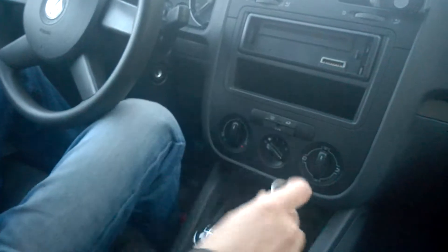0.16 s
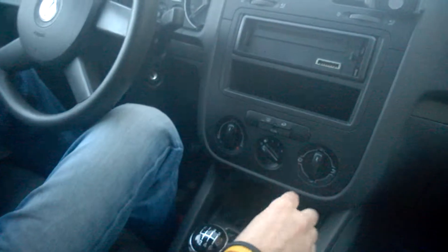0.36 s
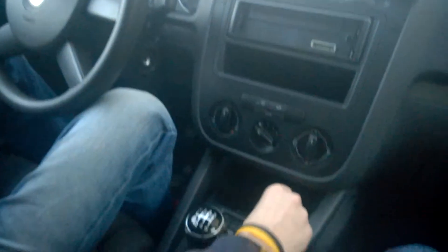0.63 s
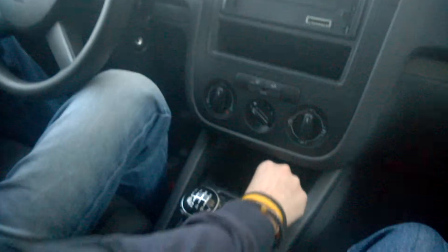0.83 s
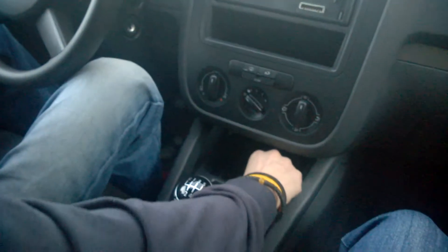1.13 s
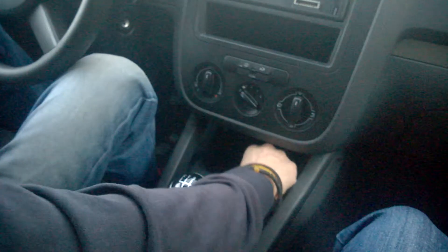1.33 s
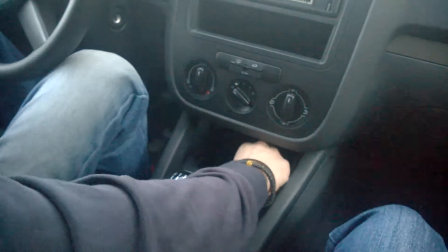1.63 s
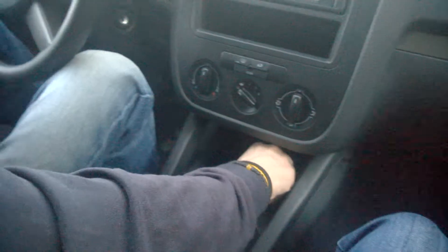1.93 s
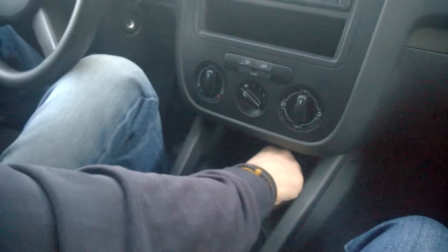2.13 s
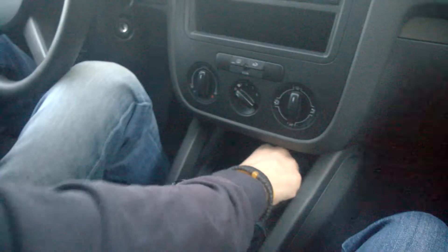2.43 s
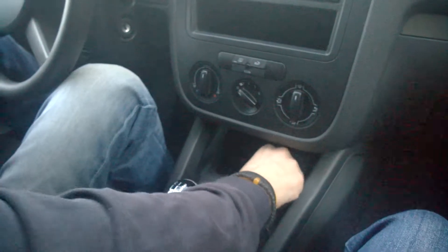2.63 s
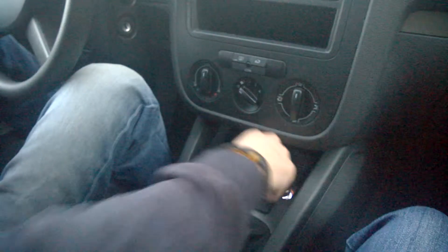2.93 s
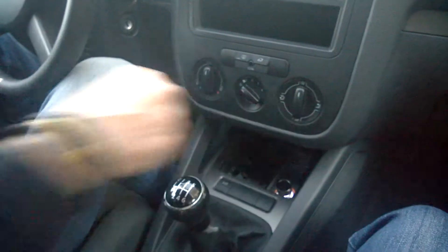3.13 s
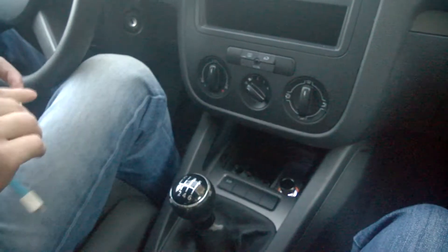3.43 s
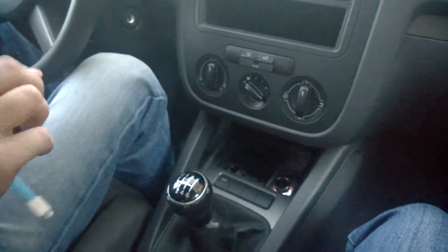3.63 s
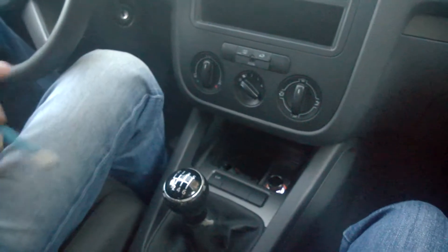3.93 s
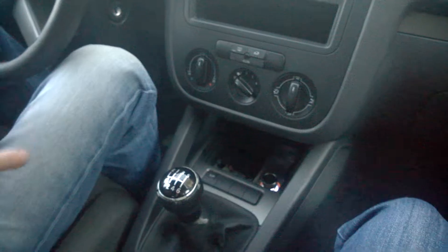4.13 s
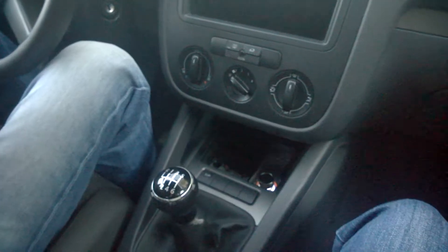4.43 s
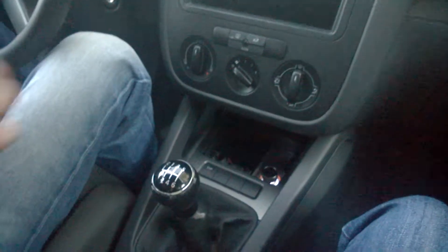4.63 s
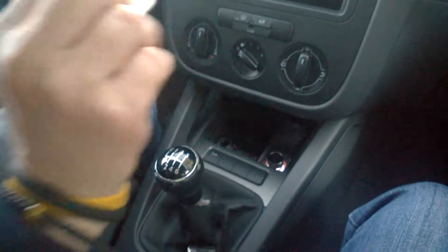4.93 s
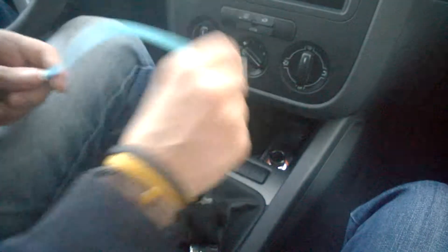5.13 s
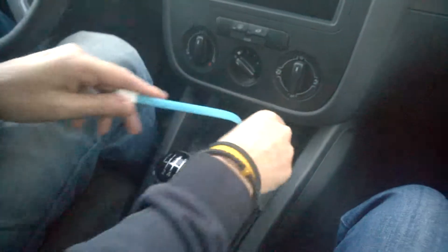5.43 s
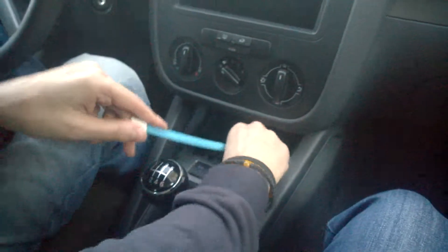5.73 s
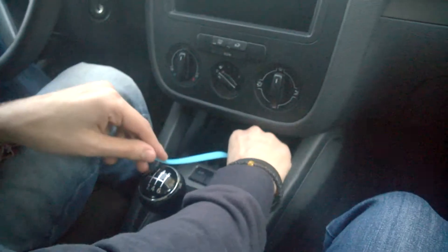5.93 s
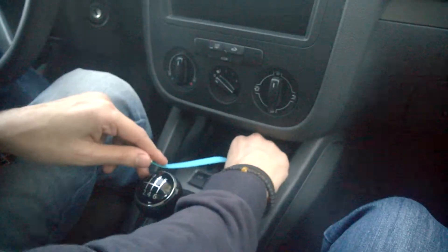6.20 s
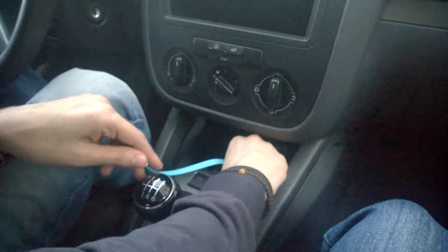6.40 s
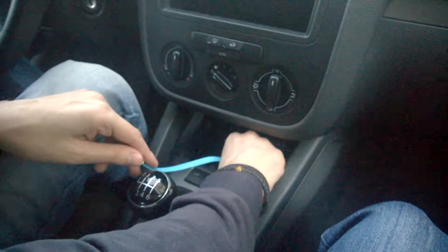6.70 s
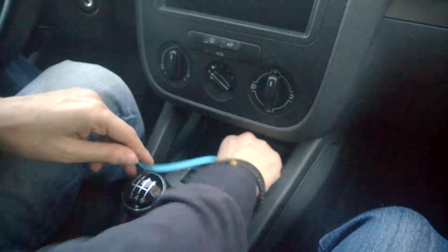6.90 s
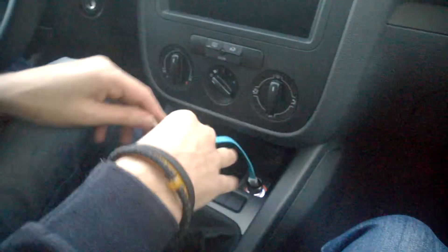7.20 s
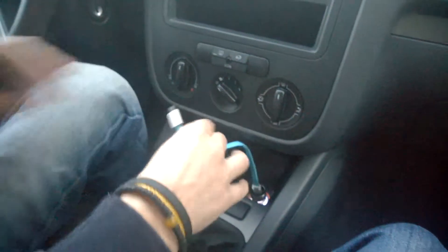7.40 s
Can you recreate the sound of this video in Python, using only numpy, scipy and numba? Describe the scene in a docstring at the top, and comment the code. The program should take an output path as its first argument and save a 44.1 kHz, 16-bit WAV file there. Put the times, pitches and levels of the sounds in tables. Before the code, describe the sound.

Hands push a charger and cable into place inside a car, with sharp plastic clicks and soft thumps over a low rumble.

```python
"""In a parked car, close to a phone, fingers and a sleeve rub over plastic. From 0.75 s hands push a charger
plug into its socket: clicks rattle the console, the plug and its metal springs, and the pushes thump the
floor tunnel. Small parts tick, trim taps dully near 4 s, then outside rumble swells and the cabin booms on
its lowest note. Near 6.4 s the cable clicks in with more thumps. Microphone hiss lies under it all."""
import sys
import numpy as np
from scipy import signal
from scipy.fft import rfft, irfft
from scipy.io import wavfile
from scipy.ndimage import uniform_filter1d
from numba import njit

SR = 44100
rng = np.random.default_rng(int(sys.argv[2]) if len(sys.argv) > 2 else 0)


def wav_out(sig):
    """Save sig, one row per channel (or a flat mono array), as 16-bit PCM at SR to the path in sys.argv[1]."""
    wavfile.write(sys.argv[1], SR, np.round(np.clip(np.atleast_2d(sig).T, -1, 1) * 32767).astype(np.int16))


N = 333108

# plug and cable contacts: t/s, level/dB, panel share/dB, hardness (the plug's share)/dB, base decay/s
CONTACTS = [(0.105, -48, -2.5, -37, 0.062), (0.755, -19, -15, -15, 0.058), (0.771, -25.5, -6, -11, 0.041),
            (1.099, -20.5, -9, -15.5, 0.073), (1.134, -33, -25, -32, 0.078), (1.159, -38, -27, -26, 0.024),
            (1.234, -20.5, -5, -18, 0.091), (1.248, -17, -35, -13.5, 0.039),
            (1.267, -20.5, -8.5, -19, 0.065), (1.288, -51, 10, -26, 0.13),
            (1.434, -30.5, -10, -16.5, 0.033), (1.442, -34, -1.5, -37, 0.095), (1.478, -37, 1.5, -16, .048),
            (1.638, -30, -8, -19.5, 0.078), (1.713, -43.5, 4.5, 3, 0.055), (1.738, -34, -2, -21, 0.06),
            (1.913, -35.5, -3.5, -29, 0.04), (1.936, -47, -1.5, -8.5, 0.037), (1.991, -49, -18, -22, 0.088),
            (2.084, -48.5, 6, -17, 0.17), (2.103, -41, -9, -18, 0.085), (2.114, -30.5, -9.5, -15, 0.051),
            (2.129, -49.5, 9, 1, 0.018), (2.187, -32, 0.5, -17, 0.07), (2.201, -37.5, 5.5, -24, .12),
            (2.256, -53, 12.5, -3.5, 0.054), (2.407, -38, -12, -36, 0.032), (2.419, -36, -10.5, -15, 0.056),
            (2.688, -42, -7, -8, 0.055), (2.733, -49, 2, -26, 0.17), (2.768, -38, -2.5, -17, 0.043),
            (3.753, -54, -17, -14, 0.027), (3.918, -40, -26, -18, 0.018), (5.384, -50.5, 17.5, -31, 0.021),
            (5.974, -39, -15, -15, 0.054), (6.311, -50.5, 0, -25, 0.036), (6.376, -26, -39, -11.5, 0.038),
            (6.386, -34.5, -15, -30, 0.049), (6.419, -45.5, 2.5, -4.5, 0.047),
            (6.571, -53.5, 8.5, -7, 0.058), (6.604, -49, 16.5, -24, 0.088), (6.622, -31, -30, -20, 0.04),
            (6.729, -47.5, -16, -6.5, 0.035), (6.922, -37, -11, -14.5, 0.058),
            (7.119, -52, -16, 0.5, 0.014)]
# the metal springs snap over an edge: t/s, level/dB, t60/s
SPRING_SNAPS = [(0.754, -39.5, .04), (0.77, -27, 0.028), (1.714, -47.5, 0.068), (2.131, -52, .02),
                (6.376, -38.5, 0.024), (6.387, -48, .025)]
# what each part rings with, from dull to bright: f/Hz, width/Hz, level/dB
PANEL_MODES = [(261, 98, -3), (398, 95, -6), (517, 364, -7)]
CONSOLE_MODES = [(844, 216, -4.5), (1430, 530, -11), (1140, 125, -7.5), (1749, 250, -9.5), (1960, 910, -8)]
PLUG_MODES = [(3330, 3000, -6), (4030, 1300, 0), (4380, 460, 0.5), (4880, 700, -3), (6230, 1900, -9.5)]
SPRING_MODES = [(7240, 1800, -8.5), (9080, 1200, -3.5), (9880, 1200, -10), (12200, 4600, -9)]
# hand pushes on the floor tunnel: t/s, level/dB, f/Hz
PUSHES = [(0.77, -22, 110), (1.107, -33.5, 114), (1.239, -33, 139), (1.29, -29, 126.5), (1.43, -27.5, 115),
          (1.481, -32.5, 125.6), (1.729, -31.5, 106.6), (1.815, -34.5, 119), (2.104, -29.5, 121),
          (2.195, -19.5, 107.7), (2.23, -22, 130.7), (2.43, -34, 89.4), (2.765, -33.5, 135),
          (2.949, -34.5, 102), (4.05, -41, 110.5), (6.041, -34.5, 94), (6.58, -22, 92),
          (6.619, -25.5, 117.6), (6.949, -40, 97), (7.265, -33, 59.5)]
# small parts of plug and cable, one note each: t/s, level/dB, f/Hz
PART_TICKS = [(0.412, -57, 4900), (2.654, -48.5, 6840), (3.072, -58, 3720), (3.097, -53, 2840),
              (3.311, -38, 3920)]
# dull taps of moving trim or upholstery: t/s, level/dB
TRIM_TAPS = [(.485, -50.5), (.543, -47.5), (.70, -47), (3.875, -45), (3.945, -52), (3.99, -56), (4.04, -45),
             (4.066, -45), (4.115, -49), (4.16, -49), (4.184, -53), (4.209, -45.5), (4.225, -46.5),
             (4.239, -46.5)]
# skin and cloth slide over plastic: start/s, end/s, level/dB, start f/Hz, end f/Hz, width/Hz
RUB_STROKES = [(0.11, 0.36, -68, 1090, 1130, 87), (0.083, 0.45, -77, 2340, 2100, 320),
               (0.057, 0.39, -76, 2700, 3300, 3100), (1.361, 1.506, -65.5, 1140, 1000, 780),
               (1.818, 1.97, -64, 580, 890, 760), (2.027, 2.12, -64.5, 830, 790, 470),
               (2.359, 2.453, -63, 910, 1250, 210), (2.778, 2.942, -74, 2600, 3500, 500),
               (2.823, 2.96, -77, 4300, 4200, 400), (6.861, 6.927, -73, 2700, 2780, 160),
               (6.86, 6.92, -75, 4350, 4300, 200), (7.03, 7.12, -64, 2000, 2100, 220),
               (7.021, 7.265, -73, 3000, 2000, 1900)]
# fader curves for the cabin's drone and the rumble, both fed from outside: t/s, level/dB
DRONE_FADER = [(0, -70), (2.9, -55.5), (3.66, -41.5), (3.91, -54.5), (4.39, -38.5), (5.09, -39),
               (5.47, -33.5), (5.7, -58.5), (7.55, -66)]
RUMBLE_FADER = [(0, -54), (1, -59), (1.4, -50), (2.8, -51.5), (3.4, -57.5), (4.1, -53), (5.25, -45),
                (5.6, -46), (5.9, -48.5), (7.55, -53)]
# tone colour of the outside rumble and the microphone hiss: f/Hz, relative level/dB
RUMBLE_SPECTRUM = [(19, -39), (32, -2), (48, -0.5), (70, -5), (135, -9.5), (171, -19.5), (247, -19.5),
                   (708, -38), (828, -41.5), (2000, -49), (2600, -61), (4400, -120)]
HISS_SPECTRUM = [(550, -27), (900, -1), (2300, -2.5), (3000, -2.5), (4600, -1.5), (7000, -9), (11000, -12),
                 (17000, -12.5)]


def clicks():
    """Each contact is a sharp tick, then uneven chatter that shakes panel, console, plug and springs."""
    hold, grit_db = 1.4, 3  # with hold above 1 the chatter hangs on before it dies
    t = np.arange(SR // 5) / SR
    shake = np.full((4, N + len(t)), 1e-18)
    for start, db, panel_db, hard_db, decay_s in CONTACTS:
        # tiny contacts a millisecond or two apart, some far harder than the rest
        grains = np.minimum(rng.exponential(size=len(t) // 60 + 1), 2.5)
        grit = undb(grit_db * (grains - 2)).repeat(60)[:len(t)]
        grit += 0.72 * np.exp(-t / 0.0019)  # the first blow is the firmest
        spring_db = -9 + 1.28 * hard_db  # the springs answer hard contacts
        parts = [(panel_db, 1.4), (-6, 1.1), (hard_db, .9), (spring_db, .7)]
        i = int(start * SR)
        for k, (share_db, stretch) in enumerate(parts):
            # the chatter holds briefly, then dies away quickly; small stiff parts settle first
            fade = undb(-60 * (t / (stretch * decay_s)) ** hold) * np.minimum(t / 0.0011, 1)
            shake[k, i:i + len(t)] += undb(db + share_db) * fade * grit * rng.standard_normal(len(t))
    for start, db, t60 in SPRING_SNAPS:
        i = int(start * SR)
        snap = undb(db - 60 * (t / t60) ** hold) * np.minimum(t / 0.0016, 1)
        shake[3, i:i + len(t)] += snap * rng.standard_normal(len(t))
    modes = (PANEL_MODES, CONSOLE_MODES, PLUG_MODES, SPRING_MODES)
    return sum(ring(x[:N], part) for x, part in zip(shake, modes))


def ring(x, modes):
    """A shaken part rings in its resonances, each filtered twice for steep skirts."""
    out = 0
    for k, (hz, width, db) in enumerate(modes):
        band = bandpass(bandpass(x, hz, 1.26 * width), hz, 1.26 * width)
        makeup = np.sqrt(SR / width / 4)  # roughly restores the power of noise
        out += (-1) ** k * undb(db) * makeup * band
    return out


def thumps(t60=0.17):
    """A soft push swells and lets the floor tunnel swing at a sagging pitch, with a weaker second mode."""
    t = np.arange(SR // 2) / SR
    attack = 1 - np.exp(-t / 0.0043)
    out = np.zeros(N + len(t))
    for start, db, hz in PUSHES:
        swing = np.sin(2 * np.pi * hz * t * (1 - 0.64 * t))
        swing += 0.22 * np.sin(2 * np.pi * (1.303 * hz * t + rng.random()))
        i = int(start * SR)
        out[i:i + len(t)] += undb(db - 60 * t / t60) * attack * swing
    return out[:N]


def jolt(start, db, hz, t60):
    """A brief knock into one resonance, roughened by a fast wobble."""
    t = np.arange(SR // 8) / SR
    out = np.zeros(N + len(t))
    wobble = 1 + 0.57 * np.sin(2 * np.pi * (0.11 * hz * t + rng.random()))
    i = int(start * SR)
    out[i:i + len(t)] = undb(db - 60 * t / t60) * wobble * np.sin(2 * np.pi * hz * t)
    return out[:N]


def ticks(ring_cycles=53):
    """Small parts of plug and cable ping; the higher the note, the sooner it dies."""
    return sum(jolt(start, db, hz, t60=ring_cycles / hz) for start, db, hz in PART_TICKS)


def taps(hz=389):
    """Trim or upholstery shifts with dull taps, each at a slightly different pitch."""
    return sum(jolt(start, db, hz * rng.normal(1, 0.052), t60=0.04) for start, db in TRIM_TAPS)


def rubs(slip_db=4):
    """Fingers and sleeve stick and slip: noise in a gliding resonance, swelling and fading unevenly."""
    out = np.zeros(N)
    for start, end, db, start_hz, end_hz, width in RUB_STROKES:
        i, j = int(start * SR), int(end * SR)
        glide = np.linspace(start_hz, end_hz, j - i)
        friction = bandpass(rng.standard_normal(j - i), glide, width)
        friction = bandpass(friction, glide, 3.9 * width)
        swell = np.hanning(j - i) ** .5 * undb(slip_db * walk(60)[i:j])
        out[i:j] += level(friction * swell, db)
    return out


def cabin(x, t60=0.047, wet_db=-13.5):
    """Short, dense reflections off glass and seats."""
    t = np.arange(SR // 4) / SR
    tail = rng.standard_normal(len(t)) * undb(-60 * t / t60) * (t > .002)
    tail = signal.lfilter([.6], [1, -.4], tail)  # upholstery dulls the treble
    tail /= np.sqrt(np.sum(tail ** 2))
    return x + undb(wet_db) * signal.fftconvolve(x, tail)[:N]


def boom(hz=38.5, waver_db=2):
    """The cabin's lowest air mode, fed from outside and by each push; pitch and strength waver a little."""
    push_share_db, rise_s, t60 = -6.5, 0.034, 0.3
    t = np.arange(N) / SR
    strength = undb(curve(DRONE_FADER) + waver_db * walk(9))
    for start, db, _ in PUSHES:
        since = np.maximum(t - start, 0)
        strength += undb(db + push_share_db - 60 * since / t60) * (1 - np.exp(-since / rise_s))
    phase = 2 * np.pi * np.cumsum(hz * (1 + .06 * walk(5.5))) / SR
    stir = level(bandpass(rng.standard_normal(N), hz, width=4.54), db=-52.5)  # chance movements
    return np.sqrt(2) * strength * np.sin(phase) + stir


def outside(bump_db=4):
    """Bumpy low rumble from outside; as it swells, a midrange rush comes up faster."""
    fader_db = curve(RUMBLE_FADER)
    rush = level(bandpass(rng.standard_normal(N), hz=800, width=1200), -74.5)
    rush *= undb(2.5 * (fader_db + 45))  # full strength at the fader's top, -45 dB
    rumble = coloured(RUMBLE_SPECTRUM) * undb(fader_db + bump_db * walk(12))
    return rumble + rush


def hiss(db=-74):
    """The microphone's steady noise floor."""
    return coloured(HISS_SPECTRUM) * undb(db)


def undb(db):
    """Gain of a level in dB."""
    return 10 ** (np.asarray(db) / 20)


def level(x, db):
    """Scale to an rms level."""
    return x * undb(db) / np.sqrt(np.mean(x ** 2))


def curve(rows):
    """Join fader points by straight lines."""
    return np.interp(np.arange(N) / SR, *np.transpose(rows))


def walk(rate):
    """Random drift: values held for 1 / rate seconds and smoothed twice."""
    span = int(SR / rate)
    steps = np.repeat(rng.standard_normal(N // span + 1), span)
    return uniform_filter1d(uniform_filter1d(steps, span), span)[:N]


def coloured(spectrum):
    """Noise with the given spectrum, rms 1."""
    hz, db = np.transpose(spectrum)
    bins_hz = np.maximum(np.arange(N // 2 + 1) * SR / N, 1)
    gain = undb(np.interp(np.log(bins_hz), np.log(hz), db))
    return level(irfft(rfft(rng.standard_normal(N)) * gain, N), 0)


@njit
def bandpass(x, hz, width):
    """State-variable band-pass with gain 1 at its centre, which may be steady or glide."""
    centre = hz * np.ones(len(x))
    out, band_state, low_state = np.empty(len(x)), 0., 0.
    for i in range(len(x)):
        tuning, damping = np.tan(np.pi * centre[i] / SR), width / centre[i]
        band = (band_state + tuning * (x[i] - low_state)) / (1 + tuning * (tuning + damping))
        band_state = 2 * band - band_state
        low_state += 2 * tuning * band
        out[i] = damping * band
    return out


def scene():
    """Mono mix: close handling in the cabin, over thumps, boom, rumble and hiss."""
    handling = clicks() + ticks() + taps() + rubs()
    return (cabin(handling) + thumps() + boom() + outside() + hiss())[None]


def record(dry):
    """The phone cuts the top above 17.2 kHz."""
    return signal.sosfilt(signal.ellip(8, .2, 70, 17200, fs=SR, output="sos"), dry)


dry = scene()
out = record(dry)
wav_out(out)
```